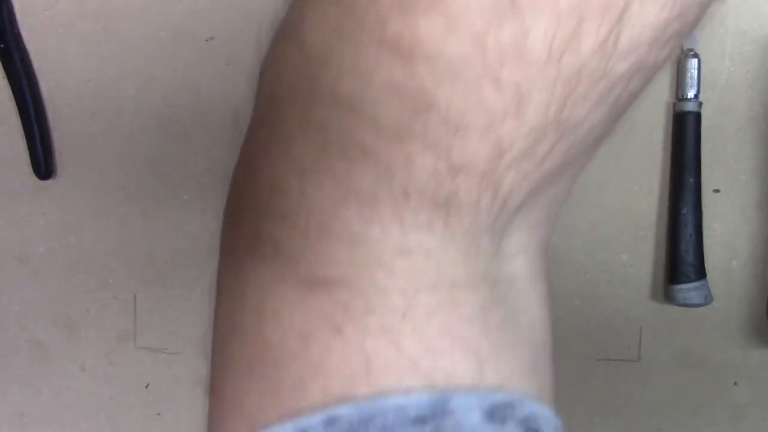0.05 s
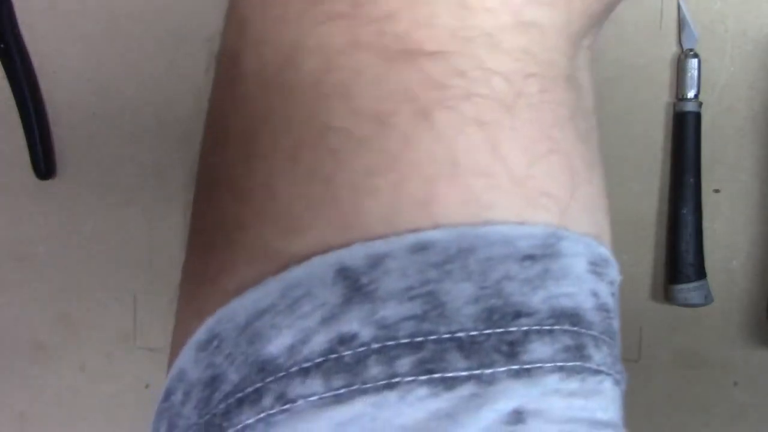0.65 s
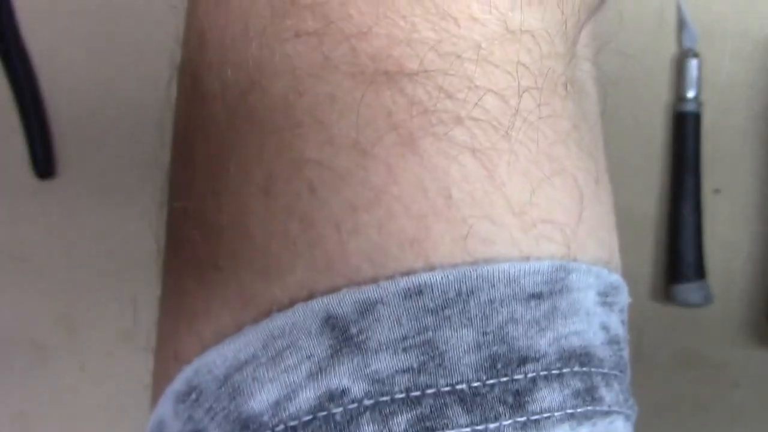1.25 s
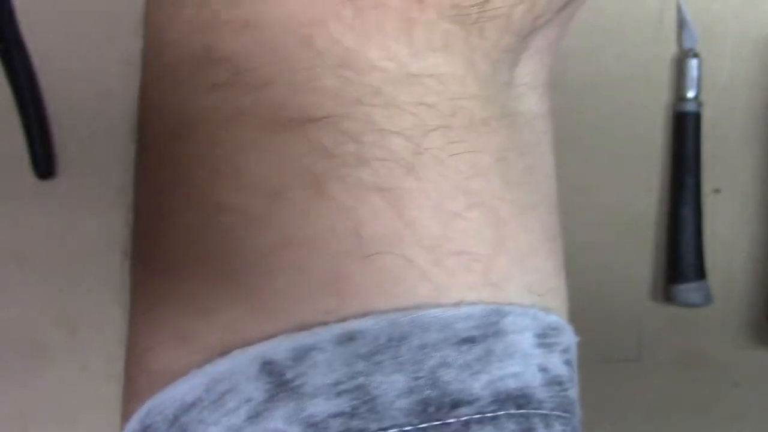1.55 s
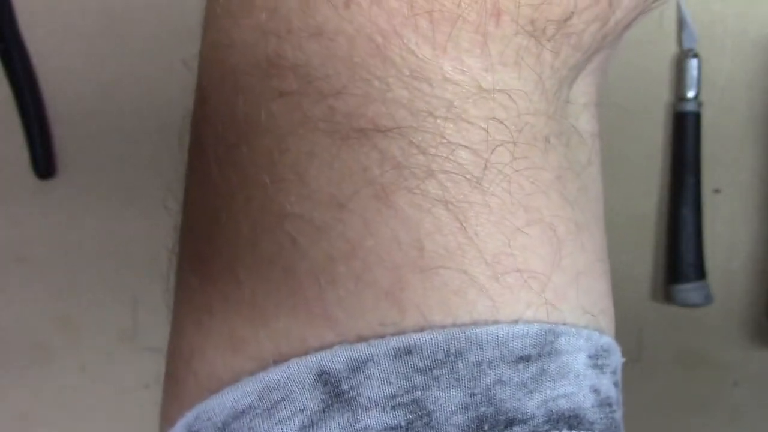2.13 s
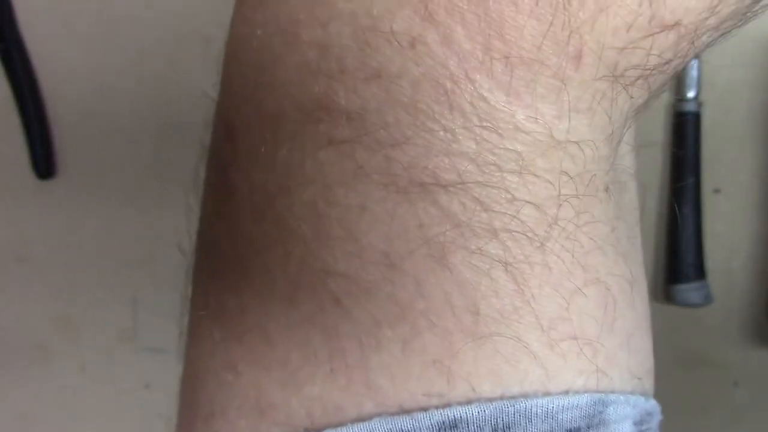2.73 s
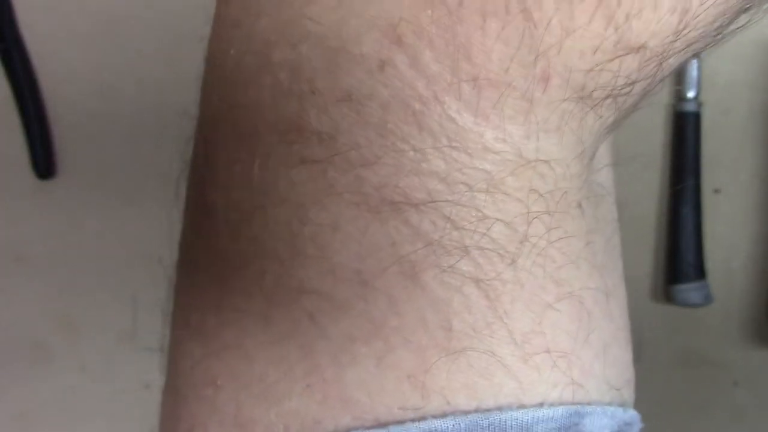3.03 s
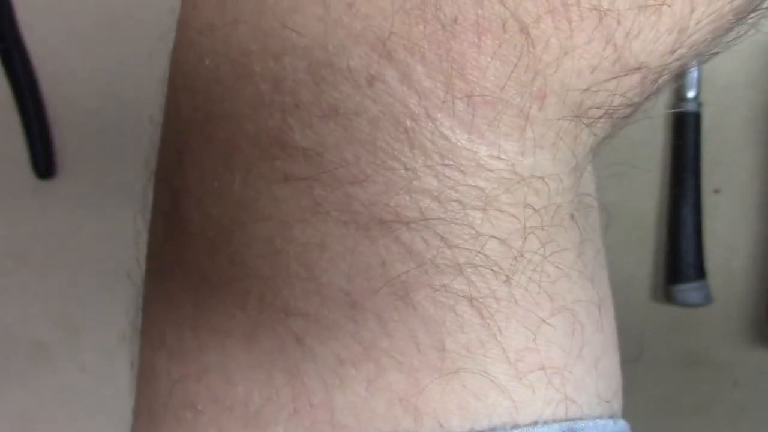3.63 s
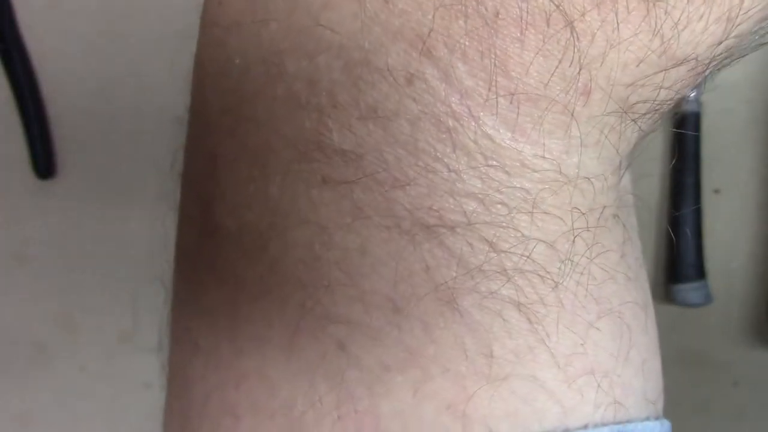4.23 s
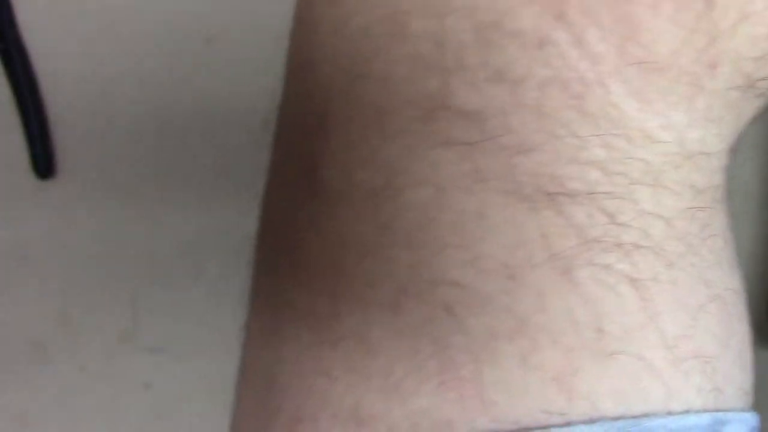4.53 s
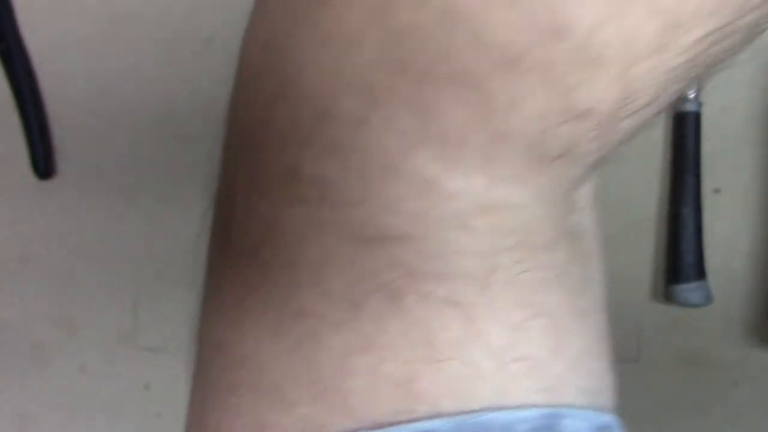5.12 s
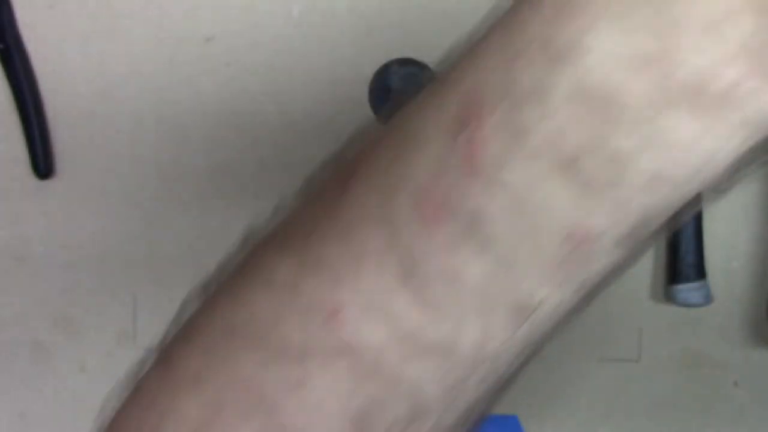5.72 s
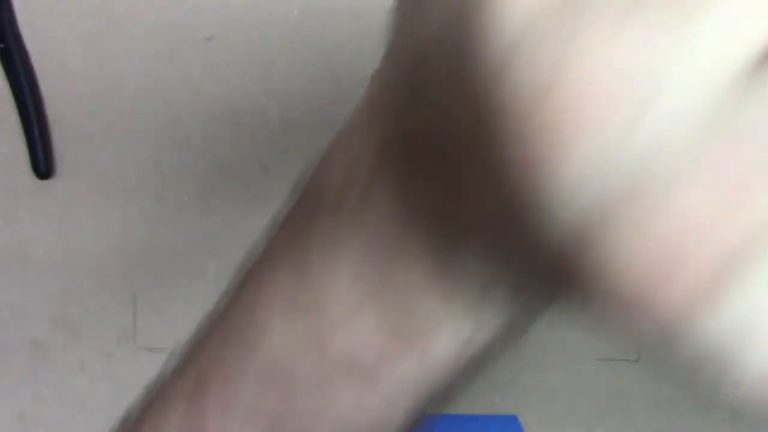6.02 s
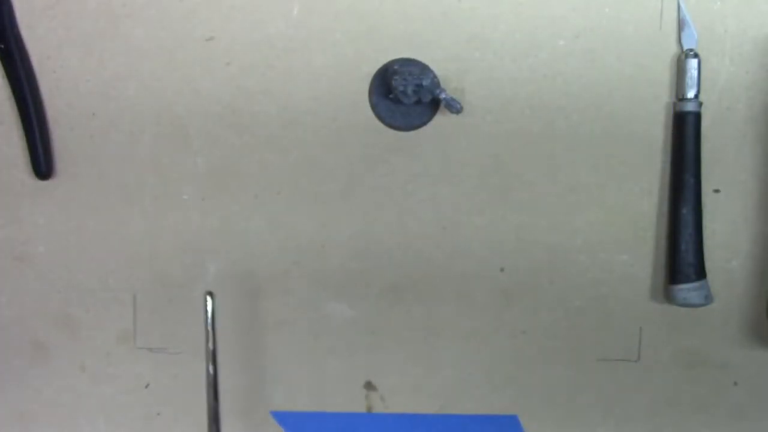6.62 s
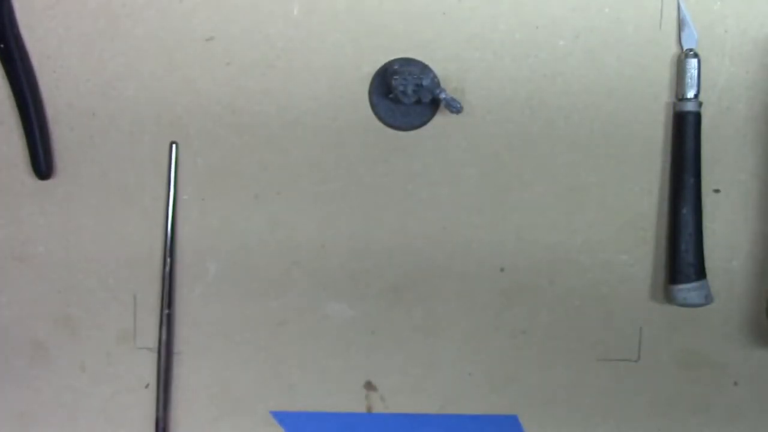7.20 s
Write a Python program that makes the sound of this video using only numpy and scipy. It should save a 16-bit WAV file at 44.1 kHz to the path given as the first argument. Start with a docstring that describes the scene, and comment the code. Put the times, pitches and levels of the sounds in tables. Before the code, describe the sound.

Small tools click lightly on a desk over a low hum, then a loud, deep knock shakes the microphone.

```python
"""Steady hum, rumble and small-room air. An arm slides as hobby tools are picked through on a desk:
each touch clicks, scuffs and rings the desk board. Near 5 s hard plastic snaps twice.
At 5.6 s a miniature is set down and the hand knocks the desk: loose things clatter, the microphone
stand booms, overloads the input, then sways and shivers on.
At 6.8 s a thin steel tool clinks as it is taken up; at 7.2 s a light thing is dropped aside."""
import sys
import numpy as np
from scipy import signal
from scipy.fft import rfft, irfft
from scipy.io import wavfile

SR = 44100
rng = np.random.default_rng(int(sys.argv[2]) if len(sys.argv) > 2 else 0)


def generate_wav(sig):
    """Save sig (samples, or channels by samples) to the path in sys.argv[1] as 16-bit PCM at SR."""
    pcm = np.round(np.clip(np.atleast_2d(sig).T, -1, 1) * 32767).astype(np.int16)
    wavfile.write(sys.argv[1], SR, pcm)


N = 324576
TIME = np.arange(N) / SR
BIN_HZ = np.fft.rfftfreq(N, 1 / SR)
JOLT_S = 5.59  # the knock sets the stand and loose things going


def gain(db):
    """Decibels to amplitude."""
    return 10 ** (np.asarray(db) / 20)


def unit_rms(x):
    """Scale to rms 1."""
    return x / np.sqrt(np.mean(x ** 2) + 1e-20)


def curve_at(points, hz):
    """Interpolate (frequency, value) points over log frequency."""
    point_hz, value = np.transpose(points)
    return np.interp(np.log(hz + 1), np.log(point_hz + 1), value)


def add(mix, start_s, sound):
    """Mix a sound in at start_s."""
    part = mix[max(round(start_s * SR), 0):][:len(sound)]
    part += sound[:len(part)]


def coloured(x, spectrum):
    """Filter by (frequency [Hz], level [dB]) points; rms 1."""
    return unit_rms(irfft(rfft(x) * gain(curve_at(spectrum, BIN_HZ)), N))


def noise(spectrum):
    """Steady coloured noise, rms 1."""
    return coloured(rng.standard_normal(N), spectrum)


def drift(rate_hz):
    """Random wander below about rate_hz, rms 1."""
    return unit_rms(irfft(rfft(rng.standard_normal(N)) / (1 + (BIN_HZ / rate_hz) ** 4), N))


def swell(centre_s, half_width_s):
    """Gaussian envelope, height 1."""
    return np.exp(-((TIME - centre_s) / half_width_s) ** 2)


def jolted(db, rise_s, t60_s):
    """Envelope after the knock: rise, then exponential decay."""
    age_s = np.maximum(TIME - JOLT_S, 0)
    return (1 - np.exp(-age_s / rise_s)) * gain(db - 60 * age_s / t60_s)


def soft_pulse(start_s, contact_s):
    """Sine-squared force of a soft contact."""
    return np.sin(np.pi * np.clip((TIME - start_s) / contact_s, 0, 1)) ** 2


def ring(modes, t):
    """Decaying sines of a struck body."""
    return sum(gain(db - 60 * t / t60_s) * np.sin(2 * np.pi * hz * t) for hz, db, t60_s in modes)


def tilted(x, db_per_octave):
    """Spectral tilt: harder contacts are brighter."""
    octaves = np.log2(np.clip(np.fft.rfftfreq(len(x), 1 / SR), 1000, 14000) / 5000)
    return irfft(rfft(x) * gain(db_per_octave * octaves), len(x))


def contacts(touches, modes, *, trim_db, accent_db, crack_db, crack_t60_s, chatter, chatter_t60_s,
             board_hz, board_lag_s, board_trim_db, board_t60_s, mode_spread_db=0, size_spread=0):
    """Each touch: a crack plus micro-impacts that ring the object and the desk board under it."""
    # desk board modes: (multiple of board_hz, level [dB])
    board_modes = [(1, 4.5), (.9, -8.5), (1.13, -7), (1.42, -15), (2.3, -12.5)]
    out, t = np.zeros(N), np.arange(SR // 10) / SR
    lead = np.zeros(SR // 100)  # space for the tilt's pre-ring
    crack_band = signal.butter(2, [1300, 11000], "bandpass", fs=SR, output="sos")
    board_highpass = signal.butter(3, 600, "highpass", fs=SR, output="sos")
    for start_s, click_db, board_db, tilt, accent_hz in touches:
        grit, slips, grain, place = rng.standard_normal((4, len(t)))
        scrape = chatter * gain(-60 * t / chatter_t60_s) * (1 - np.exp(-t / 0.00084))
        force = (t == 0) + scrape * slips
        scaled_t = t * (1 + size_spread * np.tanh(place[-1]))  # smaller tools ring higher
        # strike position weights the modes; neighbours swing in opposite senses
        body = sum((-1) ** k * gain(mode_spread_db * place[k]) * ring([mode], scaled_t)
                   for k, mode in enumerate(modes))
        body = unit_rms(body) + gain(accent_db) * unit_rms(ring([(accent_hz, 0, 0.012)], t))
        burst = grit * gain(-60 * t / crack_t60_s) * (1 - np.exp(-t / 0.00047))
        crack = gain(crack_db) * unit_rms(signal.sosfilt(crack_band, burst))
        click = unit_rms(signal.fftconvolve(force, body)[:len(t)]) + crack
        click = tilted(np.r_[lead, click], tilt)
        add(out, start_s - len(lead) / SR, gain(click_db + trim_db) * click / abs(click).max())
        board = ring([(ratio * board_hz, db, board_t60_s) for ratio, db in board_modes], scaled_t)
        thud = signal.fftconvolve(force + scrape * grain, board)[:len(t)]
        thud = unit_rms(signal.sosfilt(board_highpass, thud))
        add(out, start_s + board_lag_s, gain(board_db + board_trim_db) * thud)
    return out


def hum():
    """Steady tones, wavering in level and phase."""
    # hum lines: (frequency [Hz], rms level [dB], waver [fraction])
    lines = [(51.4, -43.5, 0.011), (120.3, -55, 0.087), (155.2, -63, 0.43), (358.4, -74.5, 0.93),
             (1670, -89, 0.66), (1745, -81.5, .5), (1970, -82.5, 0.35)]
    out = np.zeros(N)
    for hz, db, waver in lines:
        phasor = 1 + waver * (drift(1.6) + 1j * drift(1.9))
        out += gain(db) * unit_rms((phasor * np.exp(2j * np.pi * hz * TIME)).real)
    return out


def room_air(midband_db):
    """Steady air noise, level set in the 200-3000 Hz band."""
    # (frequency [Hz], density [dB])
    spectrum = [(120, -36), (200, -8.5), (234, -1.5), (255, -9), (294, -2.5), (326, -9), (362, -4),
                (471, -6.5), (591, -7), (809, -11), (1440, -9.5), (1840, -21), (2310, -19.5),
                (3210, -33.5), (12500, -45), (15000, -52)]
    air = noise(spectrum)
    midband = signal.sosfilt(signal.butter(4, [200, 3000], "bandpass", fs=SR, output="sos"), air)
    return gain(midband_db) * air / midband.std()


def rumble(rms_db):
    """Steady low noise of the building."""
    # rumble spectrum: (frequency [Hz], density [dB])
    spectrum = [(8, -19), (21, -0.5), (30, -5), (39, 1.5), (48, -11.5), (70, -16.5), (87, -4), (101, -14),
                (131, -5), (143, -9.5), (165, -11), (195, -17.5), (260, -35), (1000, -95)]
    return gain(rms_db) * noise(spectrum)


def arm_slide(rest_db, trim_db, flicker_db):
    """Skin and sleeve hiss as the arm moves; it is never quite still."""
    # arm moves: (centre [s], half width [s], level [dB])
    moves = [(.45, 0.64, -76), (2.55, .15, -79), (3.23, 0.032, -75), (4.8, .1, -72.5), (5.85, 0.085, -67.5),
             (7.0, 0.1, -69.5)]
    # friction spectrum: (frequency [Hz], density [dB])
    spectrum = [(800, -7), (3000, -9), (5000, -14.5), (7200, -11.5), (8500, -12), (10000, -13),
                (12500, -23), (16000, -24)]
    motion = gain(rest_db) + sum(gain(db) * swell(at_s, width_s) for at_s, width_s, db in moves)
    return motion * noise(spectrum) * gain(trim_db + flicker_db * drift(25))


def loose_tools():
    """Tools click and rub against each other while picked through."""
    # tool touches: (time [s], click [dB], board [dB], tilt [dB/octave], accent [Hz])
    rattles = [(0.6655, -38, -62, 6.5, 5860), (0.6943, -34, -49.5, 0.5, 8600),
               (0.7878, -23.5, -39.5, -.5, 2750), (0.8178, -28.5, -50, -1.5, 7160),
               (0.8347, -35, -56, 6, 7100), (0.9348, -44, -55, 1, 2440), (0.9476, -31.5, -57, -0.5, 7650),
               (1.0456, -51.5, -53.5, -2, 2670), (1.2686, -46, -40.5, -5, 2380),
               (1.297, -41, -49, -7, 4560), (1.3505, -35, -45.5, -4.5, 6700),
               (1.3718, -40, -46.5, -2.5, 6800), (1.7168, -64, -49, 0, 4130), (1.8013, -52, -58, -6, 6800),
               (2.4697, -45.5, -53, -4.5, 6600), (2.5846, -43.5, -57, 0, 7000),
               (2.7218, -51, -56, -0.5, 2800), (2.9217, -36.5, -52, 1.5, 6960),
               (2.9648, -34.5, -55, .5, 6900), (3.0115, -37.5, -59, 8, 6960),
               (3.0645, -48.5, -50, -2, 2600), (3.5893, -41.5, -55, 2.5, 6660),
               (3.7343, -55.5, -56.5, -5, 4600), (3.9828, -40.5, -57, 6, 6560), (4.002, -43, -59, -3, 7900),
               (4.2158, -43.5, -58, -5, 7130), (4.7246, -45, -74, 5, 6680), (4.9522, -37, -50.5, 8, 8600),
               (5.5543, -43, -52, 6, 2320), (5.932, -48.5, -51.5, -6, 3700)]
    # tool modes: (frequency [Hz], level [dB], t60 [s])
    modes = [(2280, -5, 0.036), (2396, -6, 0.05), (2790, -26, 0.051), (4110, 0.5, 0.02), (4140, -15, 0.049),
             (4570, 5, 0.012), (5600, 5.5, 0.0071), (6690, 11.5, 0.0075), (7130, 6.5, 0.025),
             (7650, 6.5, 0.0048), (8560, 2.5, 0.016), (10000, -18, 0.018), (11200, -48, .02)]
    touches = list(rattles) + fidgets(per_spell=6)
    clicks = contacts(touches, modes, trim_db=-2.5, accent_db=-1.5, crack_db=-5, crack_t60_s=0.022,
                      chatter=0.15, chatter_t60_s=0.029, mode_spread_db=3.5, size_spread=0.052,
                      board_hz=909, board_lag_s=0.00121, board_trim_db=-15, board_t60_s=0.035)
    return clicks + scuffs(touches, trim_db=-11, rise_s=0.0042, fall_s=0.017)


def scuffs(touches, trim_db, rise_s, fall_s, grain_db=-0.5, grains_per_s=2500):
    """Gritty friction around each touch as tools meet and part."""
    # scuff spectrum: (frequency [Hz], density [dB])
    spectrum = [(300, -1.5), (650, 0.5), (900, 10), (1350, 4), (1800, -16), (2400, -3), (3200, -11.5),
                (4200, -6), (5600, -19), (7100, -13.5), (9000, -16), (15000, -58)]
    t = np.arange(-SR // 20, SR // 5) / SR
    envelope = np.exp(np.minimum(t / rise_s, -t / fall_s))
    pressure = np.zeros(N)
    for touch_s, click_db, board_db, *_ in touches:
        add(pressure, touch_s + t[0], gain((click_db + board_db) / 2) * envelope)
    grains = rng.standard_normal(N) * gain(grain_db * np.minimum(rng.exponential(1, N), 4))
    grains *= rng.random(N) < grains_per_s / SR
    return gain(trim_db) * pressure * coloured(grains, spectrum)


def fidgets(per_spell, spread_db=1.5, board_offset_db=-6, accent_hz=6800, spread_octaves=0.25):
    """Rows for contacts(): faint random touches while the tools are fingered."""
    # spells of fingering: (start [s], length [s], click [dB])
    spells = [(.8, .07, -53.5), (1.287, 0.1, -54), (2.473, .15, -57), (2.931, 0.13, -57.5),
              (3.527, .08, -58.5), (3.986, 0.057, -54.5), (4.131, 0.13, -53), (4.767, 0.1, -61)]
    touches = []
    for start_s, length_s, spell_db in spells:
        times_s = start_s + length_s * (np.arange(per_spell) + rng.random(per_spell)) / per_spell
        clicks_db = spell_db + spread_db * rng.standard_normal(per_spell)
        accents_hz = accent_hz * 2 ** (spread_octaves * rng.standard_normal(per_spell))
        for at_s, db, hz in zip(times_s, clicks_db, accents_hz):
            touches.append((at_s, db, db + board_offset_db, 0, hz))
    return touches


def plastic_snaps():
    """Hard plastic snaps against its neighbours."""
    # snaps: (time [s], click [dB], board [dB], tilt [dB/octave], accent [Hz])
    touches = [(4.9936, -31.5, -41.5, -1, 2840), (5.1352, -29.5, -50, -0.83, 2840)]
    # plastic modes: (frequency [Hz], level [dB], t60 [s])
    modes = [(2130, 1, 0.03), (2850, -10, 0.015), (2840, 0, 0.017), (3320, 2, 0.018), (4100, -13, 0.0096),
             (4950, 0, 0.026), (5340, 3, .015), (5770, -12, .015), (6950, 4, 0.026), (7970, 3, 0.017),
             (8600, -6, .012), (10300, -1, 0.014)]
    return contacts(touches, modes, trim_db=-1, accent_db=1, crack_db=-1.5, crack_t60_s=0.028,
                    chatter=0.3, chatter_t60_s=0.027,
                    board_hz=1000, board_lag_s=0.00264, board_trim_db=-12.5, board_t60_s=0.022)


def hand_press():
    """The soft hand pushes down just ahead of the blow: dull, no ring."""
    # pushes: (time [s], force [dB], contact [s])
    pushes = [(5.5555, -5, 0.0102), (5.5716, -2.5, 0.0182)]
    force = sum(gain(db) * soft_pulse(at_s, contact_s) for at_s, db, contact_s in pushes)
    return signal.sosfilt(signal.butter(1, 8, "highpass", fs=SR, output="sos"), force)


def miniature_landing():
    """The miniature's base lands and rocks."""
    # landings: (time [s], click [dB], board [dB], tilt [dB/octave], accent [Hz])
    touches = [(5.5821, -15, -18, -2.5, 2090), (5.6092, -44, -59, 1, 2150), (5.6254, -41, -45, 5, 5600),
               (5.6374, -43, -51, 3, 7300)]
    # base modes: (frequency [Hz], level [dB], t60 [s])
    modes = [(1550, -4, 0.023), (1810, 2.5, 0.02), (2090, -5, 0.052), (2330, -5.5, 0.013),
             (2840, -14, 0.012), (3550, -6.5, 0.0076), (5000, -1.5, 0.01), (5650, -1.5, 0.016),
             (7000, -4, 0.027)]
    return contacts(touches, modes, trim_db=-3, accent_db=-13.5, crack_db=-9, crack_t60_s=0.016,
                    chatter=0.04, chatter_t60_s=0.021,
                    board_hz=790, board_lag_s=0.00054, board_trim_db=-21.5, board_t60_s=0.023)


def stand_boom():
    """Soft, heavy blows travel through the desk and ring the microphone stand."""
    # blows on the desk: (time [s], impulse [dB], contact [s])
    knocks = [(5.5852, -2.5, 0.00943), (5.6328, -31, 0.0038), (5.699, -17.5, 0.017), (6.158, -33.5, 0.012),
              (6.247, -32, 0.012)]
    # desk and stand modes: (frequency [Hz], level [dB], t60 [s])
    modes = [(32.13, -4, 1), (36.23, 3, 0.4), (47.43, 2.5, 0.39), (69.2, 0, 0.24), (83, -15.5, 0.42),
             (101.6, -15.5, 0.58), (124, -4.5, 0.21), (148.6, -15, 0.25), (189.5, -13, 0.4),
             (215, -25, 0.099), (280, -7, 0.11), (362, -17, 0.23)]
    force = sum(gain(db) * soft_pulse(at_s, contact_s) / (contact_s * SR / 2)
                for at_s, db, contact_s in knocks)
    return -signal.fftconvolve(force, ring(modes, TIME[:2 * SR]))[:N]


def clatter():
    """Loose things shaken by the knock: a short noise burst."""
    # clatter spectrum: (frequency [Hz], density [dB])
    spectrum = [(100, 8.5), (220, 2), (500, -8), (750, -12), (1100, -14.5), (2100, -19), (3500, -26),
                (7000, -31), (10000, -39), (15000, -48)]
    return jolted(db=-23.5, rise_s=0.0063, t60_s=0.2) * noise(spectrum)


def stand_sway():
    """The knocked stand sways: low noise that rises quickly and dies down."""
    # (frequency [Hz], density [dB])
    spectrum = [(3, 8), (12, -10.5), (25, 6), (35, -4.5), (50, -3.5), (80, -6.5), (110, -22.5),
                (250, -32.5), (1000, -82)]
    return jolted(db=-25.5, rise_s=0.049, t60_s=2.9) * noise(spectrum)


def stand_shiver(hz, waver, crest_db):
    """The stand's springy arm shivers at one pitch, builds to a crest and fades."""
    cycles = np.cumsum(hz * (1 + waver * drift(1.77))) / SR
    envelope = gain(crest_db) * swell(JOLT_S + 0.88, half_width_s=0.5)
    return envelope * unit_rms(np.sin(2 * np.pi * cycles))


def steel_clinks():
    """A thin steel tool rings as it is taken up."""
    # clinks: (time [s], click [dB], board [dB], tilt [dB/octave], accent [Hz])
    touches = [(6.7668, -25, -57, 0.43, 8441), (6.8037, -28, -60, 0.32, 6416), (6.8268, -39, -66, -2, 3725)]
    # steel modes: (frequency [Hz], level [dB], t60 [s])
    modes = [(1320, -4, 0.02), (2550, -6.5, 0.1), (3725, 5, 0.025), (5020, -5, 0.048), (6416, -4, 0.015),
             (8441, -4, 0.062), (10140, -6, 0.034), (11700, -14, .03), (12600, -20, .03)]
    return contacts(touches, modes, trim_db=-5, accent_db=-2.5, crack_db=-5.5, crack_t60_s=0.015,
                    chatter=0.066, chatter_t60_s=0.033,
                    board_hz=1250, board_lag_s=0.00141, board_trim_db=-2.5, board_t60_s=0.0074)


def light_bounces():
    """A light thing, dropped aside, bounces to rest."""
    # bounces: (time [s], click [dB], board [dB], tilt [dB/octave], accent [Hz])
    touches = [(7.1842, -30, -64, -11, 3490), (7.2052, -32, -63, -10, 2330), (7.217, -41, -52, -15, 2290),
               (7.233, -42, -51, -30, 2750), (7.247, -48, -55, -12, 2283)]
    # its modes: (frequency [Hz], level [dB], t60 [s])
    modes = [(642, -12.5, 0.028), (1360, -3.5, 0.022), (2036, 1.5, 0.035), (2260, 3, 0.052),
             (2750, 2.5, 0.026), (3660, 15.5, 0.0041), (4760, 12.5, 0.0099)]
    return contacts(touches, modes, trim_db=-1.1, accent_db=0, crack_db=-5, crack_t60_s=0.046,
                    chatter=0.054, chatter_t60_s=0.16,
                    board_hz=1210, board_lag_s=0.001, board_trim_db=-10.5, board_t60_s=0.011)


def room(x, early_db, tail_db, taps_per_s=3000):
    """Direct sound, early echoes and a short tail that dies band by band."""
    # room decay: (frequency [Hz], t60 [s])
    decay = [(200, 0.31), (1000, 0.33), (3000, 0.24), (8000, 0.23), (15000, 0.24)]
    # echoes off the desk and nearby things: (delay [s], level [dB])
    echoes = [(.0017, -41), (.0029, -17), (.0043, -40), (.0061, -10.5), (.0094, -17.5), (0.0128, -12)]
    t = TIME[:SR // 2]
    taps = rng.choice([-1., 1.], len(t)) * (rng.random(len(t)) < taps_per_s / SR) * (t > 0.006)
    hz, frame_s, bands = signal.stft(taps, SR, nperseg=256)
    bands *= gain(-60 * frame_s / curve_at(decay, hz)[:, None])
    tail = signal.istft(bands, SR, nperseg=256)[1][:len(t)]
    response = gain(tail_db) * tail / np.linalg.norm(tail)
    for delay_s, db in echoes:
        add(response, delay_s, [gain(db + early_db)])
    return x + signal.fftconvolve(x, response)[:N]


def scene():
    """Mono mix: objects sound through the room, the knock through the stand."""
    objects = clatter() + loose_tools() + plastic_snaps() + miniature_landing()
    objects += steel_clinks() + light_bounces()
    airborne = room(objects, early_db=-14, tail_db=-12)
    stand = hand_press() + stand_boom() + stand_shiver(hz=65.8, waver=0.011, crest_db=-34) + stand_sway()
    background = hum() + room_air(midband_db=-62)
    background += arm_slide(rest_db=-76, trim_db=-4.5, flicker_db=2.7) + rumble(rms_db=-51.5)
    return (airborne + stand + background)[None]


def record(dry):
    """The boom clips the input; a low-pass follows."""
    full_scale, cutoff_hz = 0.95, 15500
    clipped = np.clip(dry, -full_scale, full_scale)
    lowpass = signal.firwin(511, cutoff_hz, window=("kaiser", 9), fs=SR)
    return signal.oaconvolve(clipped, lowpass[None], "same")


dry = scene()
out = record(dry)
generate_wav(out)
```